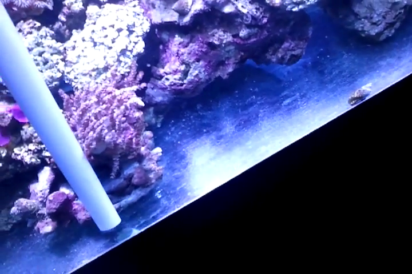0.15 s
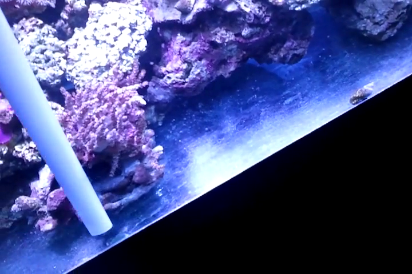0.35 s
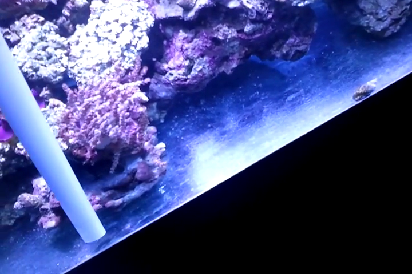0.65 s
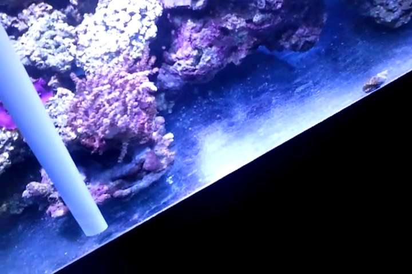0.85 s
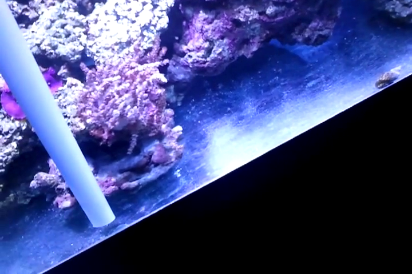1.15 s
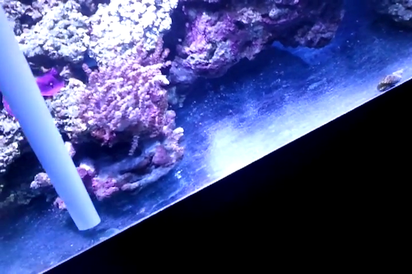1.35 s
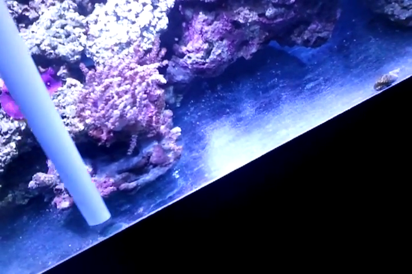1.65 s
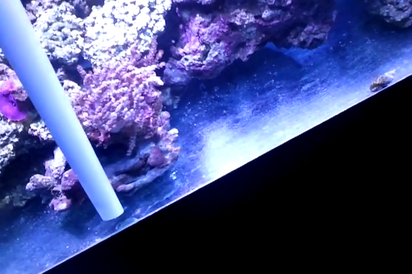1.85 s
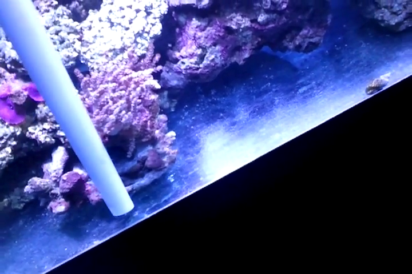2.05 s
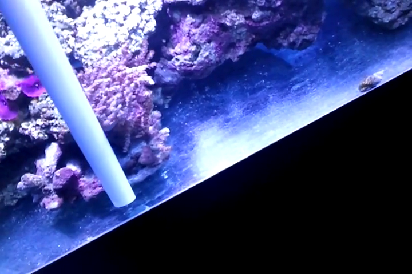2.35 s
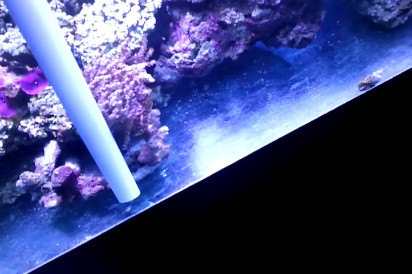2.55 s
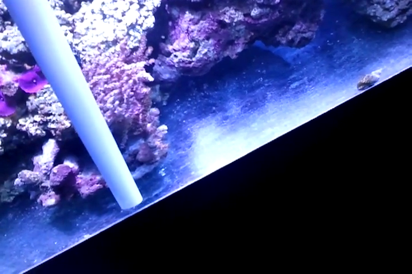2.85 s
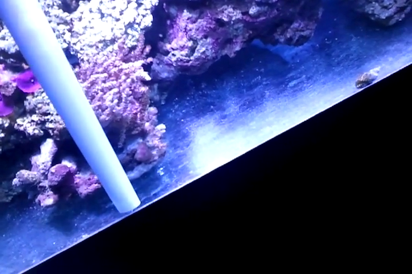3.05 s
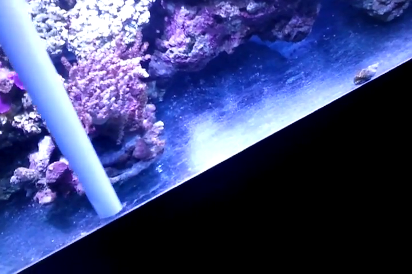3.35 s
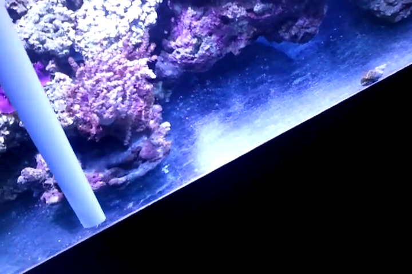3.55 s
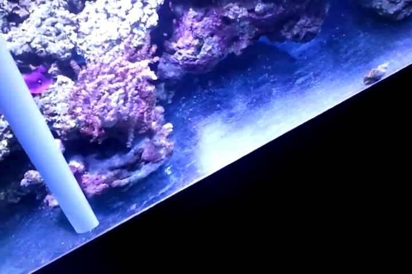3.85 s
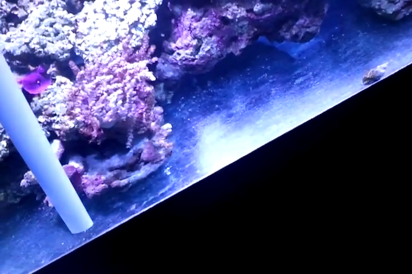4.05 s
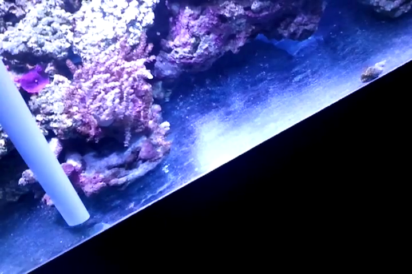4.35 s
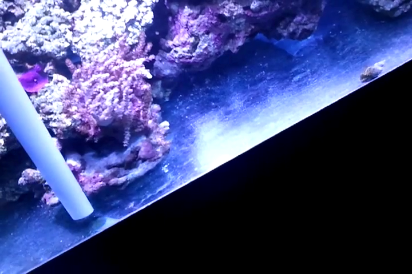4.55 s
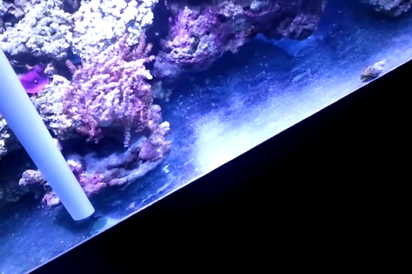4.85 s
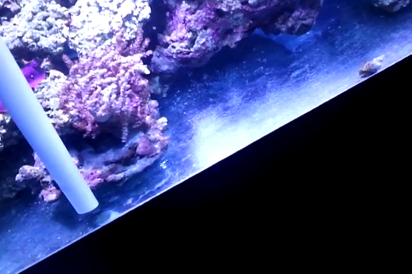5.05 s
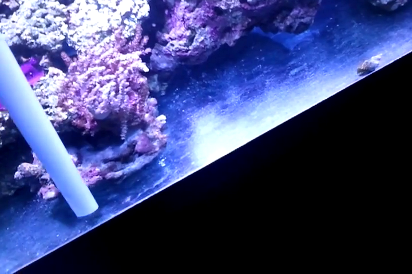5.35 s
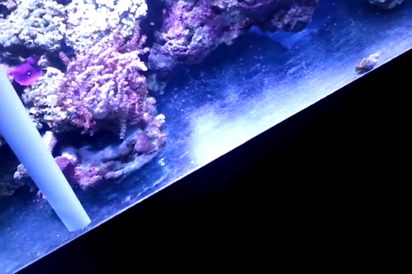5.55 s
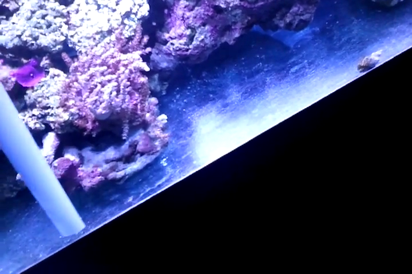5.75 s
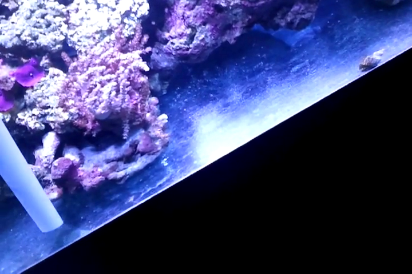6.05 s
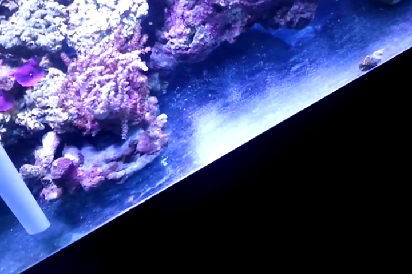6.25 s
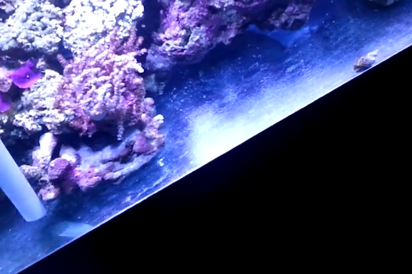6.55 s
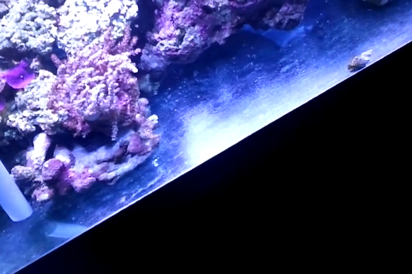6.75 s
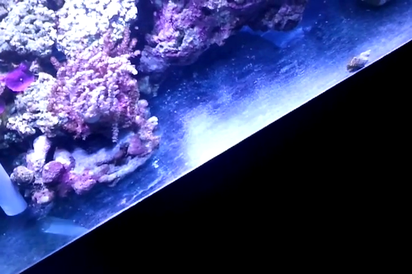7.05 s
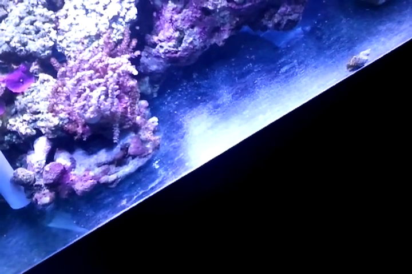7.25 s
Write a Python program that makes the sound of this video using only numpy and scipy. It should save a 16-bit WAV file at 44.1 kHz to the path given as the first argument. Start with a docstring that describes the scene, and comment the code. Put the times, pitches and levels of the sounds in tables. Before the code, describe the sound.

Close, slightly dull mono pickup of running water: fine splashing hiss, hollow rush, tiny ringing bubbles and crisp drips, with steady wavering motor tones underneath. Around one second come muffled handling bumps and a tube knock; later a deep gulp, another knock, a brief spatter with two gulps, then a splashy burst of many bubbles. The flow eases slightly before a last thump, in a small indoor space.

```python
"""A siphon runs from an aquarium into a bucket in a small room: filtered noise and random clicks make the wash,
chirped sines its bubbles, shaped bursts its snapping droplets; wandering sines hum for pumps and fans throughout.
From 0.9 to 1.8 s the hand thumps and rumbles with damped sines and noise, the tube knocking the tank near 1.4 s.
A big bubble gulps at 2 s, a knock follows at 2.9 s, and at 4.4 to 4.9 s come a spatter, two gulps and a faint rumble.
A spatter at 5.7 s leads to a knock, a thump and a flurry of gulps from 6 to 6.6 s; one last thump falls at 7.2 s."""
import sys
import numpy as np
from scipy import signal
from scipy.fft import rfft, irfft, next_fast_len
from scipy.io import wavfile

SR = 44100
rng = np.random.default_rng(int(sys.argv[2]) if len(sys.argv) > 2 else 0)


def transcribe(signal):
    """Save signal, clipped to [-1, 1], as a 16-bit WAV file at the path in sys.argv[1]."""
    frames = np.atleast_2d(signal).T
    limited = np.clip(frames, -1, 1)
    pcm = np.round(limited * 32767).astype(np.int16)
    wavfile.write(sys.argv[1], SR, pcm)


N = 325670
TIME = np.arange(N) / SR


def amp(db):
    """Decibels to gain."""
    return 10 ** (np.asarray(db) / 20)


def unit(x):
    """Scales to rms 1."""
    return x / np.sqrt(np.mean(x ** 2) + 1e-20)


def curve(rows):
    """Joins (time_s, value) rows by straight lines."""
    return np.interp(TIME, *np.transpose(rows))


def spectrum(rows, hz):
    """Reads (frequency_hz, level_db) rows on a log-frequency axis."""
    row_hz, row_db = np.transpose(rows)
    return np.interp(np.log(hz + 1), np.log(row_hz + 1), row_db)


def colour(x, rows, peaks=()):
    """Gives white sound of rms 1 a spectrum in dB per Hz, with optional resonances."""
    size = next_fast_len(N, real=True)
    hz = np.fft.rfftfreq(size, 1 / SR)
    db = spectrum(rows, hz)
    for centre_hz, width_hz, lift_db in peaks:
        db = db + lift_db * np.exp(-2 * ((hz - centre_hz) / width_hz) ** 2)
    return irfft(rfft(x, size) * amp(db), size)[:N] * np.sqrt(SR / 2)


def drift(rate_hz):
    """Slow random wander of rms 1: twelve sines up to rate_hz, the slower ones stronger."""
    t = np.linspace(0, TIME[-1], 1500)
    rates = rate_hz * np.geomspace(.1, 1, 12)[:, None]
    waves = np.sin(2 * np.pi * (rates * t + rng.random((len(rates), 1)))) / np.sqrt(rates)
    return np.interp(TIME, t, unit(waves.sum(0)))


def add(mix, start_s, sound):
    """Mixes a sound in at its start time."""
    part = mix[max(round(start_s * SR), 0):][:len(sound)]
    part += sound[:len(part)]


# Strength of the steady splashing, for fizz and trickle: time_s, level_db
SPLASH_LEVEL = [(0, 0.5), (.7, -0.5), (1.55, 1), (2.1, -1), (2.5, .5), (3.9, -1), (5.3, -1), (5.6, 0.5),
                (6.15, 1.1), (6.45, -2.5), (7.38, -2)]
# Spectrum of the splashing hiss: frequency_hz, density_db (per Hz, before the level moves)
FIZZ_SPECTRUM = [(500, -100), (1300, -86), (2400, -85), (3200, -87), (3800, -85.5), (5000, -86.5),
                 (6300, -86), (7000, -93), (7500, -104), (7700, -114)]


def fizz(per_s=1500, spread_db=5.5, grain=0.46, flicker_db=0.84, count=4):
    """Countless tiny splashes, each in its own range of pitch, merge into a grainy hiss."""
    size = next_fast_len(N, real=True)
    hz = np.fft.rfftfreq(size, 1 / SR)
    pitches = np.geomspace(1600, 6400, count)
    ticks = np.zeros(N)
    for k in range(count):
        strengths = amp(spread_db * np.minimum(rng.exponential(1, N), 5)) * rng.choice([-1, 1], N)
        clicks = strengths * (rng.random(N) < per_s / SR)  # per_s in each band
        band = np.sqrt(np.interp(hz, pitches, np.arange(count) == k))
        ticks += irfft(rfft(clicks, size) * band, size)[:N]
    grains = unit(room(ticks, t60_s=0.31))
    smooth = rng.standard_normal(N)
    spray = np.sqrt(grain) * grains + np.sqrt(1 - grain) * smooth
    return colour(spray, FIZZ_SPECTRUM) * amp(curve(SPLASH_LEVEL) + flicker_db * drift(17))


# Dull rush of flowing water and fan air: frequency_hz, density_db (per Hz, before resonances and churning)
RUSH_SPECTRUM = [(20, -69.5), (55, -69.5), (85, -70.5), (125, -66.5), (280, -67), (370, -71.5), (560, -71),
                 (760, -71), (1050, -73.5), (1500, -80), (2650, -83.5), (3200, -90.5), (7000, -100),
                 (7600, -114)]
# Hollow resonances and dips of tank and cabinet: centre_hz, width_hz, lift_db
HOLLOW_MODES = [(117, 10, 4), (172.3, 27, 6), (208, 6.2, -2.5), (302, 43, 1.5), (463, 35, 6), (656, 21, -8)]


def rush(churn_db=0.55):
    """Turbulent flow as noise, coloured by the hollows of tank and cabinet."""
    flow = colour(rng.standard_normal(N), RUSH_SPECTRUM, HOLLOW_MODES)
    return flow * amp(churn_db * drift(12))


def bubble(hz, cycles, rise):
    """A trapped air bubble rings, dying by 1/e in the given cycles, its pitch rising by a fraction up to rise."""
    t = np.arange(SR // 12) / SR
    age = t * hz / cycles
    turns = np.cumsum(hz * (1 + rise * np.tanh(age / 2))) / SR
    return np.sin(2 * np.pi * turns) * np.exp(-age) * (1 - np.exp(-t * hz))


def trickle(per_s=55, low_hz=1150, high_hz=6800, level_db=-47.0, tilt_db=-3.0, spread_db=2.0, count=36):
    """Faint bubbles of many sizes form at random; the small, high ones are weaker."""
    out = np.zeros(N)
    odds = per_s * TIME[-1] / count ** 2
    for hz in np.geomspace(low_hz, high_hz, count):
        ring = bubble(hz, cycles=12, rise=0.043)
        ring = ring * amp(level_db + tilt_db * np.log2(hz / low_hz))  # tilt per octave
        for when, chance, size in rng.random((count, 3)):
            if chance < odds:
                add(out, when * TIME[-1], ring * amp(-spread_db * np.log(size + 0.018)))
    return room(out) * amp(curve(SPLASH_LEVEL))


# The nearest bubbles and droplets: start_s, pitch_hz, level_db (before trim and tilt),
# snap_share (0 pure ring to 1 pure snap), width_octaves (of the snap)
DROPLETS = [(.147, 3470, -32.5, 1, .45), (.284, 3750, -43, 0.7, .25), (0.539, 4080, -40, 0.6, .25),
            (.605, 3620, -38, .8, .25), (.828, 3720, -39, .7, .2), (.864, 5930, -37.5, 0.97, .5),
            (.964, 2230, -38, .2, .2), (1.14, 2300, -39, 0.2, .2), (1.21, 2190, -45, 0.2, .2),
            (1.415, 4280, -35, 0.7, .5), (1.469, 4170, -32, 0.93, 0.5), (1.506, 6300, -40, 0.95, .6),
            (1.524, 3650, -42, .4, .3), (1.57, 5770, -31.5, 1, 0.38), (1.638, 6500, -37, 0.8, 0.32),
            (1.653, 5800, -34, 0.7, .8), (1.724, 3750, -34.5, .85, 0.25), (1.742, 2300, -38, 0.1, .2),
            (1.815, 1430, -41, .4, .3), (1.829, 3330, -40, 0.3, .2), (1.86, 1320, -40.5, 0.6, .3),
            (1.965, 1440, -41, 0.6, .3), (2.033, 2290, -42, .2, .2), (2.057, 2760, -41.5, 0.4, .2),
            (2.122, 7150, -39, .8, .2), (2.513, 6300, -38, 0.8, .5), (3.073, 3480, -43, .5, .3),
            (3.08, 1235, -37, .4, 0.34), (3.095, 6200, -30.5, 0.95, .68), (3.316, 4100, -33, .25, .3),
            (3.367, 3730, -36.5, .15, .2), (3.44, 1250, -40, 0.4, .3), (3.569, 5850, -31, 0.75, 0.21),
            (3.674, 3850, -36.5, .85, .5), (3.695, 4100, -41, .3, .2), (3.729, 6900, -35, .9, .45),
            (3.748, 2250, -39, 0.1, .2), (3.96, 7200, -44, .9, .2), (3.993, 6600, -34, .8, 0.54),
            (4.249, 1280, -37, .3, 0.27), (4.283, 4350, -32.5, 1, 0.9), (4.384, 5680, -32.5, .9, .5),
            (4.440, 2270, -45, .5, 0.21), (4.451, 2540, -40, 0.15, .2), (4.523, 2690, -39, 0.1, 0.18),
            (4.855, 4600, -30.5, 1, 1.8), (4.892, 5600, -32.5, 1, 0.42), (5.396, 3470, -34.5, 1, .45),
            (5.497, 5400, -33, 1, .7), (5.523, 6500, -29.5, 0.9, 0.37), (5.592, 6400, -31.5, 0.93, 0.55),
            (5.721, 5700, -38, 1, .5), (6.248, 1910, -46, .3, .3), (6.254, 6140, -37, .8, .3),
            (6.267, 4900, -39.5, .7, .3), (6.516, 6600, -32.5, 1, .6), (6.816, 6050, -31.5, 0.8, .3),
            (6.95, 3700, -34.5, 0.94, 0.92), (7.029, 6000, -29, 0.85, 0.32), (7.031, 3900, -36, 1, 1.1)]


def drops(level_db=0.77, snap_gain=4.35, tilt_db=-2.5):
    """A droplet snaps on the surface and leaves a ringing bubble; low bubbles carry best."""
    out = np.zeros(N)
    for start_s, hz, drop_db, snap_share, octaves in DROPLETS:
        ring = np.sqrt(1 - snap_share) * bubble(hz, cycles=14, rise=.012)
        crack = np.sqrt(snap_share) * snap_gain * snap(hz, octaves)
        gain = amp(drop_db + level_db + tilt_db * np.log2(hz / 5000))
        add(out, start_s, gain * (ring + crack))
    return room(out, t60_s=0.084, tail_db=-3.0)


def snap(hz, octaves, snap_s=.0004, crackle=3.4, evenness=0.49, top_hz=6900,
         skirt_db=-7, skirt_hz=2200, sharp=0.85, first_s=.0005):
    """A cluster of tiny cracks in a band around hz, over a broad skirt; wider snaps are shorter."""
    t = np.arange(SR // 12) / SR
    f = np.fft.rfftfreq(len(t), 1 / SR)
    noise = rng.standard_normal(len(t))
    spiky = np.sign(noise) * abs(noise) ** crackle
    cracks = spiky * t * np.exp(-t * octaves / snap_s)
    cracks /= np.linalg.norm(cracks)
    cracks[np.searchsorted(t, first_s)] += sharp * octaves  # the widest snaps are mostly one clean crack

    core = 1 / np.sqrt(1 + (2 * np.log2((f + 1) / hz) / octaves) ** 8)
    skirt = amp(skirt_db) * octaves * f ** 2 / (f ** 2 + skirt_hz ** 2)
    band = np.maximum(core, skirt) / np.sqrt(1 + (f / top_hz) ** 40)
    bins = rfft(cracks)
    evened = bins / (abs(bins) + 1e-12) ** evenness  # an even spectrum: a tick, not a ping
    burst = irfft(evened * band, len(t))
    burst /= np.linalg.norm(burst)
    return burst * (1 - t / t[-1]) ** 2


# The stream spatters harder for a moment: start_s, length_s, level_db (rms, before room and trim),
# middle_hz, spread_octaves (either side of the middle)
SPATTER_BURSTS = [(1.44, 0.5, -60.5, 4800, 0.41), (2.982, .17, -62, 4500, 0.64),
                  (4.362, 0.099, -52, 4200, 0.8), (5.706, 0.13, -56.5, 4200, 0.64),
                  (6.055, 0.41, -49.5, 2090, 0.95), (6.091, 0.46, -47.5, 558, 0.65)]


def spatter(cycles=1.3, spread_db=4.0, count=260):
    """A flurry of short-lived bubbles, each with its own pitch and strength, thinning out towards its end."""
    out = np.zeros(N)
    for start_s, length_s, db, middle_hz, octaves in SPATTER_BURSTS:
        flurry = np.zeros(N)
        for when, pitch, size in rng.random((count, 3)):
            hz = middle_hz * 2 ** (octaves * (2 * pitch - 1))
            pop = bubble(hz, cycles, rise=.03) * amp(-spread_db * np.log(size + 0.034))
            add(flurry, start_s + length_s * when ** 1.2, pop)
        out += amp(db) * flurry * np.sqrt(length_s * SR) / np.linalg.norm(flurry)
    return room(out, t60_s=0.3, tail_db=-3.5) * amp(-5.5)


# Large pockets of air gulp in the water: start_s, level_db (before trim), pitch_hz (at the start)
AIR_GULPS = [(2.045, -29, 196), (4.695, -27, 167.4), (4.897, -30, 232), (6.083, -31, 203),
             (6.103, -33, 120), (6.126, -32, 270), (6.135, -30, 450), (6.148, -31, 163), (6.152, -30, 580),
             (6.193, -32, 530), (6.204, -39, 195), (6.238, -34, 265), (6.305, -32, 640), (6.331, -33, 255),
             (6.515, -27, 262), (6.540, -28, 153), (6.558, -30, 201), (6.588, -30, 293), (6.603, -36, 162)]


def gulps(cycles=3.5, rise=0.09, level_db=2):
    """Big bubbles burble: each rings low for a few cycles and bends upward."""
    out = np.zeros(N)
    for start_s, db, hz in AIR_GULPS:
        add(out, start_s, amp(db + level_db) * bubble(hz, cycles, rise))
    return out


# The tube knocks and judders against the tank: start_s, level_db, tilt_db (hardness, per octave)
TUBE_KNOCKS = [(1.375, -26, 1), (1.389, -38, 25), (1.406, -35, 2), (1.418, -41, 24), (1.432, -37, 9),
               (2.915, -33.5, -17), (6.033, -33, -2)]
# What the tank rings with: pitch_hz, level_db (relative to the knock), t60_s
TANK_MODES = [(226, -1, 0.069), (290.6, 4, 0.13), (478, -10.5, 0.13)]


def knocks():
    """The tube rings the tank's modes; a harder knock brings out the higher ones."""
    out = np.zeros(N)
    pivot_hz = TANK_MODES[1][0]
    for start_s, db, tilt_db in TUBE_KNOCKS:
        for hz, mode_db, t60_s in TANK_MODES:
            gain = amp(db + mode_db + tilt_db * np.log2(hz / pivot_hz))
            add(out, start_s, gain * blow(hz, t60_s))
    return out


# Colour of the grip's rumble: frequency_hz, level_db (relative)
RUMBLE_COLOUR = [(10, -9), (25, 7.5), (65, 1), (110, -15.5), (220, -24), (600, -45), (2000, -86)]
# The grip shifts and rumbles: start_s, length_s, level_db (rms while held)
GRIP_SHIFTS = [(.92, 0.18, -32), (1.14, 0.12, -38), (1.41, 0.13, -38.5), (1.61, 0.064, -34.5),
               (4.76, 0.059, -42)]
# Colour of the moving tube's dull churn: frequency_hz, level_db (relative)
CHURN_COLOUR = [(40, -10), (90, -1.5), (230, -0.5), (380, -13), (700, -16.5), (1100, -16.5), (3000, -32.5),
                (6000, -48)]
# Strokes of the tube through the water: start_s, length_s, level_db (rms while held, before the lumps)
TUBE_STROKES = [(1.45, 0.68, -47), (2.9, 0.13, -40), (6.03, 0.41, -47), (6.53, 0.064, -41)]
# Soft thumps of the hand: start_s, level_db, pitch_hz, t60_s
HAND_THUMPS = [(.977, -17.5, 110, 0.022), (1.000, -23, 75, .04), (1.043, -22, 70, 0.044),
               (1.062, -18, 100, .025), (1.096, -26, 110, 0.018), (1.113, -19, 48, 0.049),
               (1.17, -19, 75, 0.034), (1.212, -24, 70, .04), (1.257, -20, 125, 0.028),
               (1.295, -21, 190, 0.02), (1.441, -24, 135, 0.052), (1.512, -24, 100, 0.028),
               (1.549, -25, 150, 0.012), (1.639, -23, 60, 0.039), (1.659, -29, 50, 0.054),
               (1.696, -27, 140, .025), (1.721, -26, 150, .018), (1.744, -20, 190, 0.0078),
               (6.032, -21, 135, 0.051), (7.197, -24, 125, 0.072)]


def handling(lumps_db=3.0):
    """Low rumble and thumps of a shifting grip, and the lumpy churn of the moving tube."""
    rumble = unit(colour(rng.standard_normal(N), RUMBLE_COLOUR))
    grip = rumble * movements(GRIP_SHIFTS)
    churn = unit(colour(rng.standard_normal(N), CHURN_COLOUR))
    tube = churn * movements(TUBE_STROKES) * amp(lumps_db * drift(25))
    for start_s, db, hz, t60_s in HAND_THUMPS:
        add(grip, start_s, amp(db) * blow(hz, t60_s))
    return grip + tube


def movements(rows, attack_s=0.013, release_s=0.051):
    """Each movement builds up, holds for its length and dies away."""
    out = np.zeros(N)
    for start_s, length_s, db in rows:
        age = np.maximum(TIME - start_s, 0)
        build = 1 - np.exp(-age / attack_s)
        fade = np.exp(-np.maximum(age - length_s, 0) / release_s)
        out += amp(db) * build * fade
    return out


def blow(hz, t60_s, attack_s=0.0018, scuff=0.19):
    """A soft blow: one damped mode with a dull scuff of contact."""
    t = np.arange(SR // 3) / SR
    dull = signal.butter(2, 2 * hz, fs=SR, output="sos")
    rub = unit(signal.sosfilt(dull, rng.standard_normal(len(t))))
    shape = (1 - np.exp(-t / attack_s)) * np.exp(-np.log(1000) * t / t60_s)
    return shape * (np.sin(2 * np.pi * hz * t) + scuff * rub)


DRONE_HZ, DRONE_DB = 298.2, -43  # the strongest pump tone: centre pitch, rms level before it waxes and wanes
# The drone waxes and wanes: time_s, level_db
DRONE_SWELL = [(0, -0.5), (1.3, 2), (1.5, -5), (1.68, 1), (2.1, -0.5), (2.4, -0.5), (3.55, -1), (3.8, 1.5),
               (4.6, 3.5), (5.2, -4.5), (5.8, 0.5), (6.35, 0.5), (6.7, 3), (7.1, 3.5), (7.38, 2.5)]


def drone(wander=0.00086, waver_db=1.57):
    """The loudest pump tone, a sine, wanders a little in speed as it waxes and wanes."""
    turns = np.cumsum(DRONE_HZ * (1 + wander * drift(.8))) / SR + rng.random()
    level_db = DRONE_DB + curve(DRONE_SWELL) + waver_db * drift(3.5)
    return np.sqrt(2) * amp(level_db) * np.sin(2 * np.pi * turns)


# Steady tones of pumps and fans: pitch_hz (centre), level_db (rms, before waver and beating)
MOTOR_TONES = [(119.8, -47), (170.5, -50), (214.9, -49.5), (240.0, -54), (256.1, -52), (262.6, -60),
               (306.8, -51), (576.1, -57), (613.4, -55), (657.7, -60), (701.3, -58.5), (789.3, -51.5),
               (833.3, -52), (852.7, -49), (877.0, -53.5), (936.2, -50.5), (964.9, -50), (1008.6, -54),
               (1028.6, -50), (1140.5, -56), (1363.2, -57), (1403.5, -64), (1447.5, -57), (1533.7, -61),
               (1763.1, -64.5), (1910.1, -62.5), (2044.6, -64), (2555.9, -62)]


def motors(wander=0.0008965, waver_db=1.6, beat_hz=2.6, beat_depth=0.35):
    """Each sine wanders a little in speed and strength; two pumps beat on the lowest one."""
    out = np.zeros(N)
    for k, (hz, db) in enumerate(MOTOR_TONES):
        turns = np.cumsum(hz * (1 + wander * drift(.8))) / SR + rng.random()
        phase = 2 * np.pi * turns
        tone = np.sin(phase)
        if k == 0:
            tone = tone - beat_depth * np.sin(phase + 2 * np.pi * beat_hz * TIME)
        out += np.sqrt(2) * amp(db + waver_db * drift(3.5)) * tone
    return out


# First reflections from glass and walls: delay_s, level_db
REFLECTIONS = [(.0019, -14.5), (.0037, -10), (0.0127, -6.5), (.0141, -14.5), (.022, -18)]


def room(x, t60_s=0.23, tail_db=-4):
    """Direct sound, a few hard reflections and a short diffuse tail."""
    t = np.arange(SR // 2) / SR
    decay = np.exp(-np.log(1000) * t / t60_s) * (1 - np.exp(-t / 0.0025))
    tail = rng.standard_normal(len(t)) * decay
    response = amp(tail_db) * tail / np.linalg.norm(tail)
    response[0] += 1
    for delay_s, db in REFLECTIONS:
        add(response, delay_s, np.array([amp(db)]))
    return signal.fftconvolve(x, response)[:N]


def scene():
    """Water, handling and motors at one microphone."""
    water = fizz() + rush() + trickle() + drops() + spatter() + gulps()
    hand = knocks() + handling()
    machines = drone() + motors()
    return (water + hand + machines)[None]


# Overall level of everything: time_s, level_db
OVERALL_SWELL = [(0, 1.5), (.35, -1), (.88, -1), (1.55, 2.5), (1.82, 2.5), (2.3, -0.1), (2.82, 0),
                 (3.03, 1.5), (3.3, 0), (4.2, -0.7), (4.42, 0.7), (5.12, -.5), (5.72, 1), (6.01, 0.3),
                 (6.22, 3.5), (6.8, 0.64), (7.38, -0.5)]
EDGE_HZ = 7620  # top of the band


def record(dry):
    """The input sits on a bias; sound and bias drift in level together, and the band ends steeply."""
    bias = -.2
    swollen = (dry + bias) * amp(curve(OVERALL_SWELL))
    taps = signal.firwin(801, EDGE_HZ, window=("kaiser", 10), fs=SR)
    half = len(taps) // 2
    padded = np.pad(swollen, ((0, 0), (half, half)), mode="edge")
    return signal.oaconvolve(padded, taps[None], "valid")


dry = scene()
out = record(dry)
transcribe(out)
```